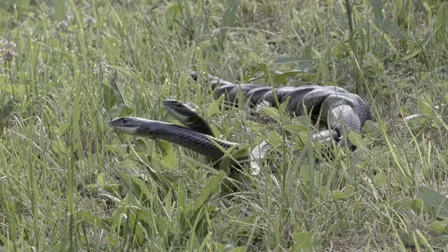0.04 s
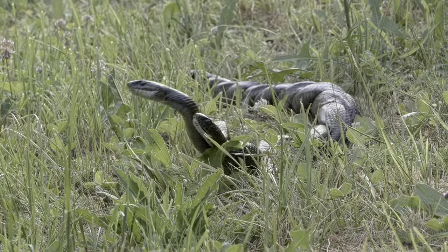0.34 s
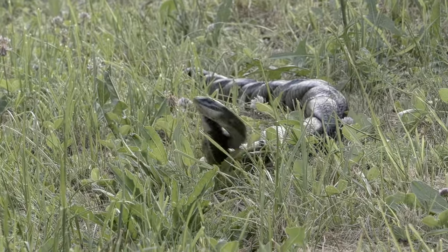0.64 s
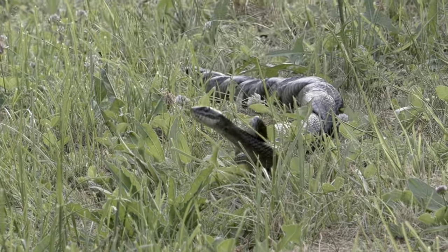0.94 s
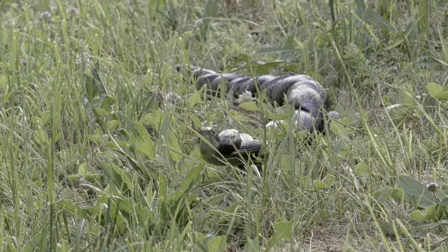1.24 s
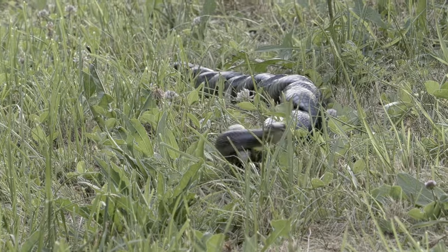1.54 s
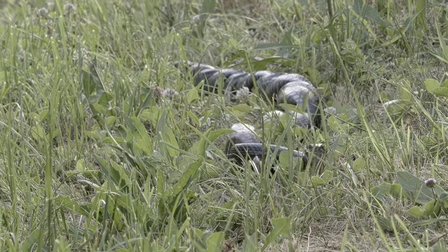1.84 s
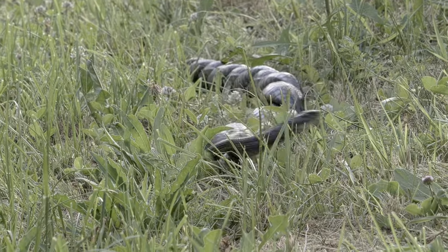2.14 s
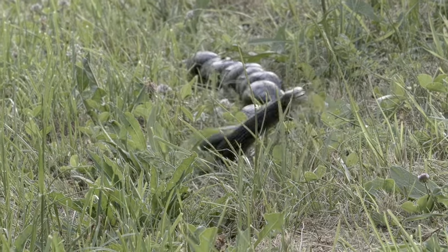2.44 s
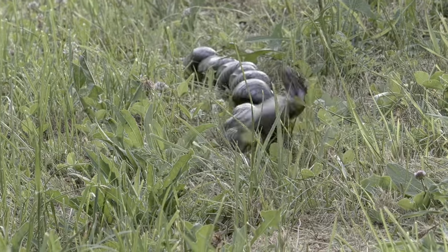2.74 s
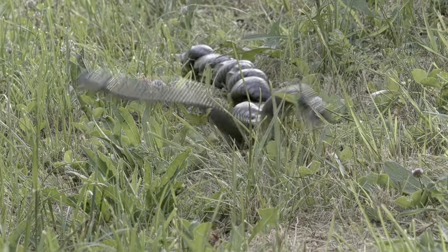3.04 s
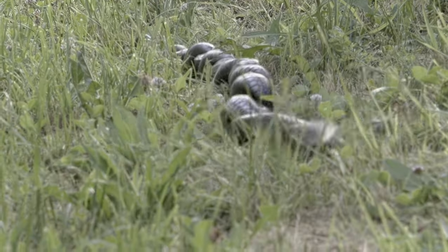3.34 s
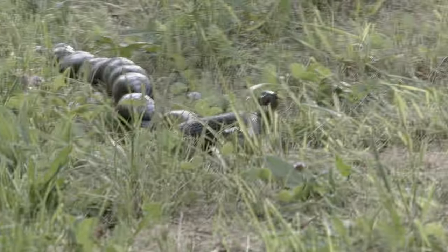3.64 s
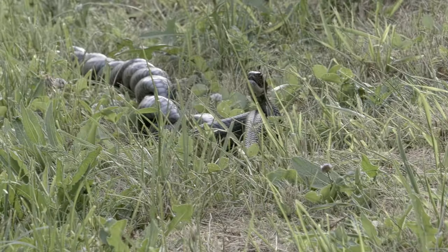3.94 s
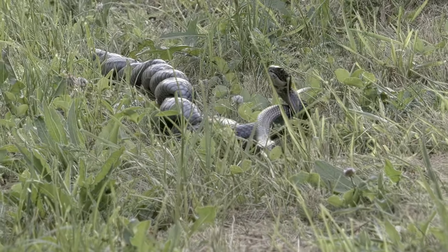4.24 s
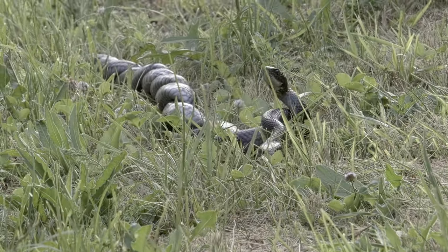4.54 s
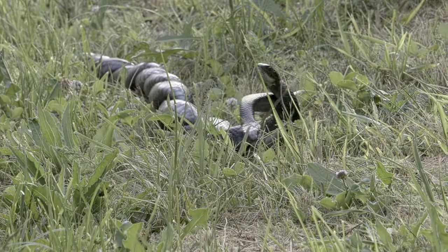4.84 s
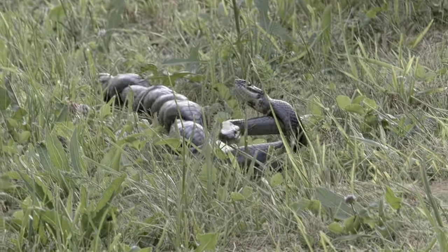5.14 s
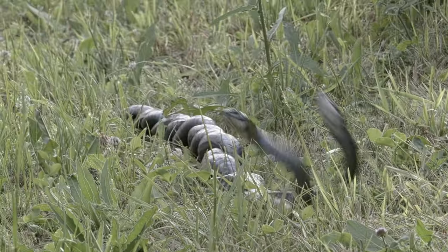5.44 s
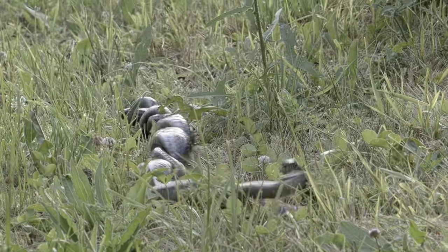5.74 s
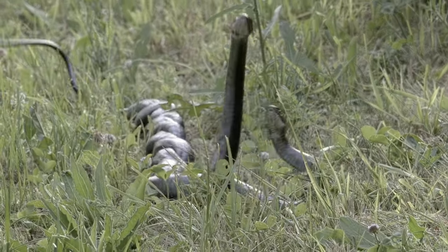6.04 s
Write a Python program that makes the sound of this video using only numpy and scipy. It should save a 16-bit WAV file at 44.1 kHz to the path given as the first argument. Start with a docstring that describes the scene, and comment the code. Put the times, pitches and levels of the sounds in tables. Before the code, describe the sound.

Quiet outdoor hiss and distant traffic, with faint rustles of snakes in grass and a sharp plastic double click midway.

```python
"""In a meadow, two snakes wrestle: their bodies brush through the grass in short, faint strokes.
The plastic shell of a hand-held camera rings with two sharp clicks, and the hand holding it
makes small ticks, bumps and rubs. Behind lie the steady rumble of far traffic, faint outdoor
noise coloured by the camera's housing, an insect's thin buzz, two bird chirps and microphone hiss."""
import sys
import numpy as np
from scipy import signal
from scipy.fft import rfft, irfft, next_fast_len
from scipy.io import wavfile
from scipy.ndimage import uniform_filter1d, map_coordinates

SR = 44100
rng = np.random.default_rng(int(sys.argv[2]) if len(sys.argv) > 2 else 0)


def bounce(signal):
    """Save signal as a 16-bit WAV file at the path given by the first command-line argument."""
    frames = np.transpose(np.atleast_2d(signal))
    limited = np.clip(frames, -1, 1)
    pcm = np.round(limited * 32767).astype(np.int16)
    wavfile.write(sys.argv[1], SR, pcm)


N = 268128


def amp(db):
    """Turn decibels into a factor to multiply a sound by."""
    return 10 ** (np.asarray(db) / 20)


def unit(x):
    """Scale a signal so that its average size (rms) is 1."""
    return x / np.sqrt(np.mean(x ** 2) + 1e-20)


def clock():
    """The time of every sample, in seconds."""
    return np.arange(N) / SR


def along(points, hz):
    """Read a curve of (frequency, value) points at hz, on a log frequency axis."""
    f, values = np.transpose(points)
    return np.interp(np.log(hz + 1), np.log(f + 1), values)


def wobble(rate):
    """A smooth curve through `rate` random values a second."""
    values = rng.standard_normal(int(N * rate / SR) + 4)
    return map_coordinates(values, [np.arange(N) * rate / SR])


def filtered(x, response):
    """Multiply each frequency f in x by response(f)."""
    n = x.shape[-1]
    padded = next_fast_len(n + 8192)
    return irfft(rfft(x, padded) * response(np.fft.rfftfreq(padded, 1 / SR)), padded)[..., :n]


def resonance(f, hz, width):
    """The response of something that rings at hz; the smaller the width, the longer it rings."""
    return 1j * f * width / (hz * hz - f * f + 1j * f * width)


def spread(pair, spectrum):
    """Filter two unrelated signals into stereo sound of size 1, alike on both sides in the bass."""
    # how alike left and right are (1 = the same): f/Hz, likeness
    alike = [(25, 1), (60, 1), (130, 1), (290, 1), (640, 0.94), (1000, 0.79), (1410, 0.35), (3100, 0.55),
             (7000, 1), (11000, 0.17)]

    def response(f):
        angle = np.arccos(np.clip(along(alike, f), -1, 1)) / 2
        return spectrum(f) * np.array([np.cos(angle), np.sin(angle)])
    mid, side = filtered(pair, response)
    return unit(np.array([mid + side, mid - side]))


def rush(points):
    """Stereo noise shaped by (f/Hz, level/dB) points."""
    return spread(rng.standard_normal((2, N)), lambda f: amp(along(points, f)))


def patchy(x, depth_db, size=256):
    """Make small patches of time and frequency randomly louder or softer."""
    patches = signal.stft(x, nperseg=size)[2]
    field = rng.standard_normal(patches.shape[1:])
    field = uniform_filter1d(field, size=4, axis=0)  # smooth over frequency
    field = uniform_filter1d(field, size=7, axis=1)  # and over time
    return signal.istft(patches * amp(depth_db * unit(field)), nperseg=size)[1][:, :x.shape[1]]


def crackle(size, rate, scatter_db):
    """Two channels of tiny contacts of random size, about `rate` a second."""
    hits = rng.random(size) < rate / SR
    return unit(hits * amp(scatter_db * rng.standard_normal(size)) * rng.standard_normal((2, size)))


def swell(t, rise, fall):
    """A smooth hump that peaks at t = 0."""
    return np.exp(-.5 * (t / np.where(t < 0, rise, fall)) ** 2)


def add(out, s, sound):
    """Mix a short sound in at s seconds."""
    start = round(s * SR)
    skip = max(-start, 0)
    part = sound[..., skip:N - start]
    out[:, start + skip:start + skip + part.shape[-1]] += part


def tap(scuff_db, fade_s):
    """One sharp hit, then a brief scuff of the surfaces that falls 60 dB in fade_s."""
    t = np.arange(SR // 10) / SR
    return (t == 0) + amp(scuff_db - 60 * t / fade_s) * rng.standard_normal((2, len(t)))


def background():
    """Far traffic slowly moves away, faint outdoor noise fades with it, and one engine swells once."""
    # the traffic's low rumble: f/Hz, level/dB
    rumble_shape = [(20, -42), (50, -36), (65, -13), (85, -7), (110, -2.5), (145, -0.5), (180, -1.5),
                    (230, 0.5), (300, -2), (380, -7), (550, -9.5), (900, -49)]
    # its higher roar: f/Hz, level/dB
    roar_shape = [(50, -80), (200, -53), (350, -4.5), (480, -2), (700, -0.5), (840, -0.5), (970, 2.5),
                  (1130, -4.5), (1400, -9.5), (1900, -15), (3500, -50)]
    # faint outdoor noise, coloured by the resonances of the camera's housing: f/Hz, level/dB
    outdoor_shape = [(700, 2.5), (1300, -5.5), (1650, 3.5), (1880, -3.5), (2100, 8), (2380, 4), (2580, -1),
                     (2830, 3), (3000, 3), (3250, 3.5), (3800, -5.5), (5500, -18.5), (9000, -18.5)]
    t = clock()
    rumble_db, roar_db, sway_db = -60 - 0.12 * t, -56 - 0.3152 * t, .4
    rumble = amp(rumble_db + sway_db * wobble(12)) * unit(patchy(rush(rumble_shape), 1, size=4096))
    roar = amp(roar_db + sway_db * wobble(5.8)) * unit(patchy(rush(roar_shape), 1, size=2048))
    outdoor_noise = amp(roar_db - 6.5 + sway_db * wobble(4.52)) * rush(outdoor_shape)
    engine_hz = 146 + 2.3 * wobble(6)
    engine = unit(np.sin(2 * np.pi * np.cumsum(engine_hz) / SR))
    drone = amp(-66 + 1.8 * wobble(9)) * swell(t - 0.3, rise=0.12, fall=0.89) * engine
    return rumble + drone + (roar + outdoor_noise) * amp([[.7], [-.7]])


def insect():
    """An insect's thin, wavering buzz fades while its pitch creeps up, then stops."""
    t = clock()
    db, hz = -73 - 2 * t, 7560 + 140 * t
    stop_s, release_s, blur_hz = 1.6, 0.066, 640
    singing = np.clip((stop_s - t) / release_s, 0, 1)
    blur = filtered(rng.standard_normal((2, N)), lambda f: 1 / (1 + np.abs(f / blur_hz) ** 3))
    tone = np.sin(2 * np.pi * np.cumsum(hz + 60 * wobble(13)) / SR)
    buzz = unit(blur * tone)  # the noise smears the tone into a narrow band
    return singing * amp(db + wobble(13)) * buzz * amp([[-1], [2]])


def bird():
    """A small, far bird chirps twice: pure tones that slide up and level off, with a faint echo."""
    # chirps: t/s, length/s, relative level/dB, start/Hz, top/Hz, end/Hz
    chirps = [(.658, 0.067, -68.5, 3030, 4260, 3830), (0.825, 0.064, -64.5, 3330, 4170, 4080)]
    glide_s, echo_db, echo_s = .016, -5, .25
    out = np.zeros((2, N))
    for s, length, db, start_hz, top_hz, end_hz in chirps:
        t = np.arange(round(length * SR)) / SR
        glide = (start_hz - top_hz) * np.exp(-(t / glide_s) ** 2)
        pitch = top_hz + glide + (end_hz - top_hz) * t / length
        loudness = amp(db + 4.5) * np.sqrt(np.sin(np.pi * t / length))
        add(out, s, loudness * np.sin(2 * np.pi * np.cumsum(pitch) / SR))
    t = np.arange(SR // 3) / SR
    tail = rng.standard_normal((2, len(t))) * amp(-60 * t / echo_s)
    echo = signal.fftconvolve(out, tail / np.linalg.norm(tail[0]), axes=1)[:, :N]
    return out + amp(echo_db) * echo


def hand_rubs():
    """Skin creeps over the camera's plastic: a fine scrape above a low rumble."""
    # slides of the hand: t/s, scrape/dB, rumble/dB, length/s
    rubs = [(3.438, -54, -54, 0.049), (3.807, -62.5, -83, .037), (5.024, -65, -82, .16),
            (5.212, -61, -54, 0.094), (5.64, -73, -55, 0.064), (5.833, -65.5, -63.5, 0.49)]
    rise_share = 0.36  # part of a rub spent getting louder
    slips = crackle(N, rate=3500, scatter_db=2)
    scrape = spread(slips, lambda f: resonance(f, hz=2080, width=3200) ** 2)
    rumble = spread(rng.standard_normal((2, N)), lambda f: resonance(f, hz=270, width=420) ** 2)
    out = np.zeros((2, N))
    for s, scrape_db, rumble_db, length in rubs:
        loudness = swell(clock() - s, rise_share * length, (1 - rise_share) * length)
        out += loudness * (amp(scrape_db) * scrape + amp(rumble_db) * rumble)
    return out


def shell(f, damping):
    """The camera's plastic shell rings at many pitches at once but gives off little bass."""
    # the shell's ringing pitches: f/Hz, width/Hz, left level/dB, right level/dB
    modes = [(900, 49, -20.5, -22.5), (1320, 78, -19, -27), (1665, 106, -10, -12), (2159, 96, 1, -9),
             (2830, 77, -32, -11), (3236, 146, -10, -11), (3950, 170, -29, -12), (4635, 195, -7.5, -36),
             (5260, 460, -10, -20.5), (5820, 260, -8, -17), (6640, 320, -6, -16.5), (7560, 490, -15.5, -27),
             (8200, 270, -35, -21.5), (10250, 710, -33, -45), (15100, 1500, -33, -46)]
    ring = sum((-1) ** k * amp([[left], [right]]) * resonance(f, hz, damping * width)
               for k, (hz, width, left, right) in enumerate(modes))
    delay_s = np.array([[0], [.00003]])  # the sound reaches the right microphone later
    bass_cut = 1j * f / (1j * f + 700)
    return ring * np.exp(-2j * np.pi * f * delay_s) * bass_cut


def camera_knocks():
    """Clicks ring the camera's whole shell, ticks a small part of it, and bumps only thud."""
    # sharp clicks: t/s, strength/dB, damping by the finger (a factor on ring width)
    clicks = [(3.5716, 22, 0.88), (3.6428, 22.5, 0.85)]
    # light ticks under the fingers: t/s, strength/dB, f/Hz, width/Hz
    ticks = [(3.429, -11.5, 2090, 2130), (3.4581, -22.5, 7240, 2400), (3.6294, -20, 4800, 3400),
             (3.7727, -16.5, 2300, 900), (3.7976, -8, 3370, 1090), (6.0490, -7, 3400, 690)]
    # soft bumps of the grip: t/s, strength/dB, f/Hz
    bumps = [(3.4123, -6.5, 660), (3.4533, -28, 368), (3.457, -1.5, 360)]
    out = np.zeros((2, N))
    hit = 1.0 * (np.arange(SR // 10) == 0)
    for s, db, damping in clicks:
        click = amp(db) * filtered(hit, lambda f: shell(f, damping))
        add(out, s, click)
        ground_echo = filtered(click, lambda f: 1 / (1 + 1j * f / 2200) ** 2)  # dulled by the grass
        add(out, s + 0.015, amp(-28) * ground_echo)
    bright_snap = lambda f: amp(-10) * resonance(f, hz=4440, width=1450) ** 2
    for s, db, hz, width in ticks:
        contact = tap(scuff_db=-22, fade_s=.014)
        tick = filtered(contact, lambda f: resonance(f, hz, width) ** 2 + bright_snap(f))
        add(out, s, amp(db) * tick)
    for s, db, hz in bumps:
        add(out, s, amp(db) * filtered(hit, lambda f: resonance(f, hz, 2 * hz) ** 3))
    return out


def snakes_in_grass():
    """Scales drag over grass blades in many tiny slips; now and then a stalk snaps."""
    # bodies sweeping the grass: t/s, level/dB, length/s, strongest f/Hz
    strokes = [(0.116, -56.5, 0.025, 7540), (2.276, -59.5, 0.025, 7200), (2.309, -61, 0.057, 10000),
               (2.325, -60.5, 0.055, 7800), (2.405, -66.5, 0.067, 8200), (2.611, -69.5, .035, 8000),
               (3.147, -60, 0.029, 8200), (3.223, -58.5, 0.057, 8100), (4.157, -70.5, .048, 7300),
               (5.208, -65, 0.055, 7350), (5.451, -71.5, 0.071, 9400), (5.724, -64.5, 0.029, 8660),
               (5.8, -74, 0.13, 7050)]
    # single stalks snapping: t/s, peak level/dB, f/Hz
    snaps = [(2.556, -52.5, 9000), (2.831, -46, 8200), (3.089, -53, 9050), (5.808, -49, 6000)]
    rise_share, brisk_s = .38, 0.039  # part of a stroke spent getting louder; length of a quick one
    out = np.zeros((2, N))
    t = np.arange(-SR // 4, SR // 2) / SR  # time around a stroke's peak
    for s, db, length, hz in strokes:
        width = hz * (brisk_s / length) ** .5  # a quicker stroke hisses over a wider band
        slips = patchy(crackle(len(t), rate=4000, scatter_db=3), depth_db=3)
        blades = spread(slips, lambda f: resonance(f, hz, width) ** 4)
        loudness = amp(db) * swell(t, rise_share * length, (1 - rise_share) * length)
        add(out, s + t[0], loudness * blades)
    for s, db, hz in snaps:
        snap = filtered(tap(scuff_db=-13, fade_s=0.013), lambda f: resonance(f, hz, .6 * hz) ** 2)
        add(out, s, amp(db) * snap / np.abs(snap).max())
    touches = crackle(N, rate=50, scatter_db=2.5)
    stirring = spread(touches, lambda f: resonance(f, hz=5000, width=5000) ** 2)
    return (out + amp(-85) * stirring) * amp([[-.7], [.7]])  # a little to the right


def scene():
    """The meadow and the camera held above it."""
    return snakes_in_grass() + camera_knocks() + hand_rubs() + bird() + insect() + background()


def record(dry):
    """The microphones colour the treble and add hiss; the lowest bass and highest treble are cut."""
    # colouring by the microphone openings: f/Hz, gain/dB
    openings = [(6500, 0), (8100, 5), (8600, 2), (9100, -2), (9800, 3), (11000, 4.5)]
    # the microphones' own hiss: f/Hz, level/dB
    hiss_shape = [(500, -26), (4000, -0.5), (5500, 2.5), (7000, -1), (8200, -5), (9100, -16.5),
                  (9900, -5.5), (10800, -6.5), (12000, -0.5), (14000, 2), (16000, -1.5)]
    # wind filter that turns down the bass: f/Hz, gain/dB
    wind_filter = [(25, -10), (50, -11), (65, -3), (85, 0)]
    top_hz = 15850
    heard = filtered(dry, lambda f: amp(along(openings, f)))
    hiss = unit(filtered(rng.standard_normal((2, N)), lambda f: amp(along(hiss_shape, f))))
    return filtered(heard + amp(-64) * hiss, lambda f: amp(along(wind_filter, f)) * (f < top_hz))


dry = scene()
out = record(dry)
bounce(out)
```